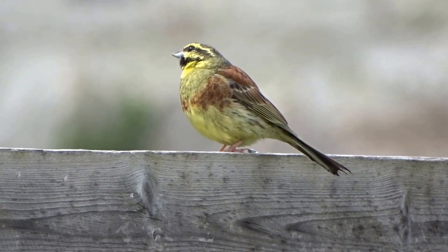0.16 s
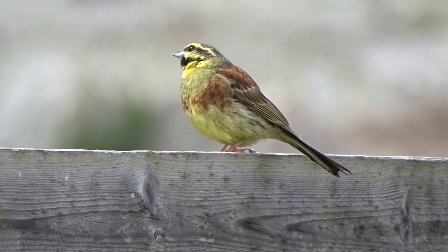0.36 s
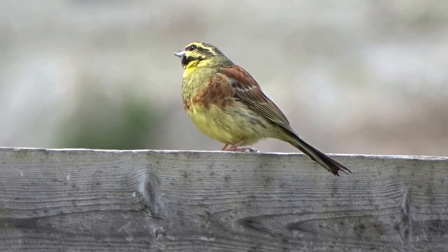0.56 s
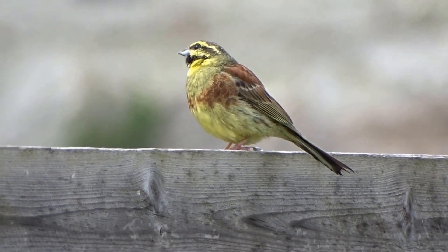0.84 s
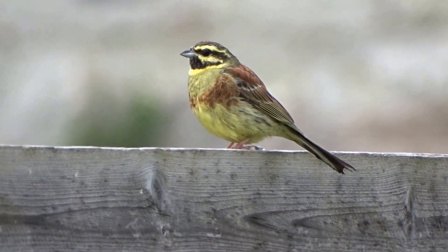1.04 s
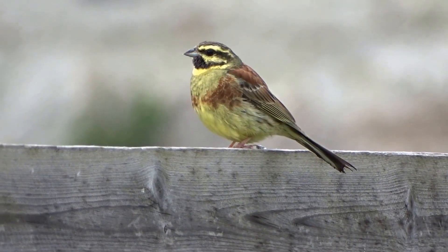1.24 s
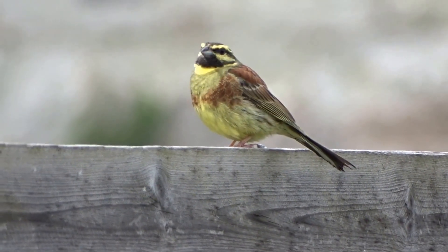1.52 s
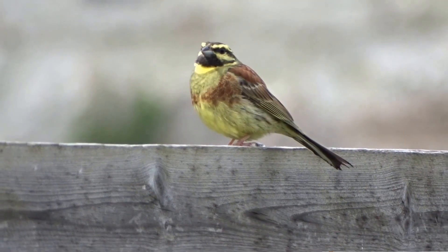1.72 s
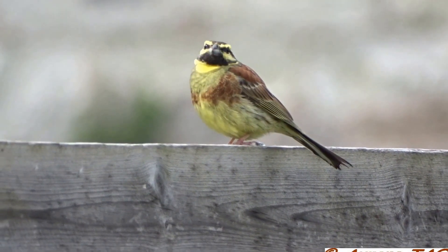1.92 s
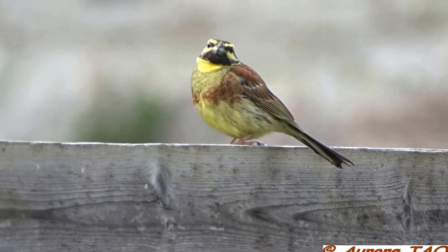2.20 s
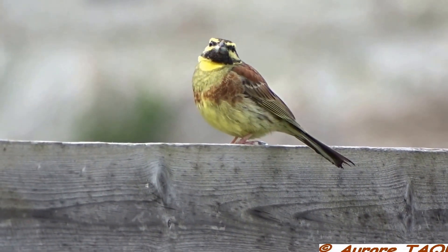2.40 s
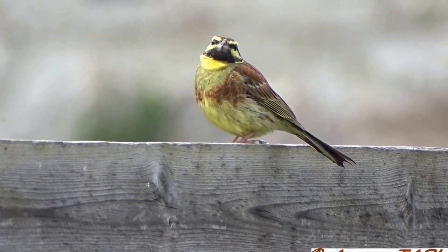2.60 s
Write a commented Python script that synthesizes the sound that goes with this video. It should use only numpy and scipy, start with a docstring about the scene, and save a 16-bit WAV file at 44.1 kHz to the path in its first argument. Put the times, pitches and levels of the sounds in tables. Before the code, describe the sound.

A bunting gives a thin, sharp call, and a second bird answers faintly. Call and answer come once more. Small birds chirp far off outdoors, over a steady rumble of distant traffic and a soft hiss.

```python
"""Distant traffic rumbles from the start, under a soft hiss and a faint band of far birdsong.
A bunting on a fence gives a thin, sharp call: both sides of its voice box glide down together and beat,
and the surroundings scatter the sound back. A second bunting answers faintly as small birds chirp far
off. Call and answer come once more; near the end, more chirps mingle with a few faint rustles."""
import sys
import numpy as np
from scipy import signal
from scipy.fft import rfft, irfft
from scipy.io import wavfile

SR = 44100
rng = np.random.default_rng(int(sys.argv[2]) if len(sys.argv) > 2 else 0)


def file_out(sig):
    """Save sig as 16-bit WAV at sys.argv[1]."""
    # one column per channel
    cols = np.atleast_2d(sig).T
    # limit, then scale
    lim = np.clip(cols, -1, 1)
    pcm = np.round(lim * 32767).astype(np.int16)
    wavfile.write(sys.argv[1], SR, pcm)


N = 121275
T = np.arange(N) / SR


def amp(db):
    """The decibel scale: amplitude grows tenfold every 20 dB."""
    return 10 ** (np.asarray(db) / 20)


def unit(x):
    """Normalisation to an rms of one."""
    return x / np.sqrt(np.mean(x ** 2) + 1e-20)


def curve(points, t):
    """Linear interpolation between table rows."""
    return np.interp(t, *np.transpose(points))


def pan(db):
    """Interchannel level difference: gains that put left db above right."""
    return amp(np.array([[db], [-db]]) / 2)


def add(mix, start_s, sound):
    """Superposition: a sound sums into the mix from its start time."""
    part = mix[:, max(round(start_s * SR), 0):][:, :sound.shape[-1]]
    part += sound[..., :part.shape[1]]


def wander(n, rate_hz):
    """Random modulation: low-passed noise with an rms near one."""
    hz = np.fft.rfftfreq(N, 1 / SR)
    low_pass = np.exp(-(hz / rate_hz) ** 2)
    return unit(irfft(rfft(rng.standard_normal(N)) * low_pass, N))[:n]


def stereo_noise(correlation):
    """Partial coherence: left and right share part of their white noise."""
    common, left, right = rng.standard_normal((3, N))
    return np.sqrt(correlation) * common + np.sqrt(1 - correlation) * np.array([left, right])


def wash(spectrum, correlation):
    """Spectral shaping: coloured stereo noise with an rms of one."""
    hz, db = np.transpose(spectrum)
    colour = amp(np.interp(np.log(np.fft.rfftfreq(N, 1 / SR) + 1), np.log(hz), db))
    return unit(irfft(rfft(stereo_noise(correlation)) * colour, N))


def traffic():
    """Broadband and tonal noise: low rumble, tyre roar and the wavering drones of passing engines."""
    # Each row: frequency in Hz, relative spectral density in dB.
    rumble_spectrum = [(15, -45), (28, -31), (42, -4), (56, -2), (74, -10.5), (105, -8), (135, -4.5),
                       (175, -2), (230, -2), (295, -3), (390, -12), (600, -22.5), (1500, -50.5)]
    roar_spectrum = [(100, -43), (300, -3), (450, -1), (700, 1.5), (1100, 2), (1450, -1), (2000, -8.5),
                     (2700, -15.5), (3400, -22.5), (4500, -29.5), (7000, -52), (12000, -57)]
    # Each row: time in seconds, level in dB.
    rumble_level = [(0, -46), (.45, -47.5), (1.2, -46), (1.4, -45), (1.65, -44), (1.9, -48), (2.35, -44),
                    (2.55, -47.5), (2.75, -48)]
    roar_level = [(0, -45), (.6, -45), (1.15, -44.5), (1.45, -43), (2.0, -42.5), (2.4, -43.5),
                  (2.75, -45.5)]
    # Each row: pitch and its rms waver in Hz, peak level in dB, peak time and spread in seconds.
    drones = [(105.2, 6.95, -55.5, 1.1, 2.8), (165.6, 5, -47, 2.266, 0.14),
              (179.7, 10.73, -52.5, 0.67, 0.46)]
    rumble = wash(rumble_spectrum, correlation=.99) * amp(curve(rumble_level, T))
    roar = wash(roar_spectrum, correlation=.7) * amp(curve(roar_level, T))
    flutter_db = 1.1 * wander(N, rate_hz=15)
    out = rumble + pan(db=2) * roar * amp(flutter_db)
    for hz, waver_hz, db, peak_s, spread_s in drones:
        cycles = np.cumsum(hz + waver_hz * wander(N, rate_hz=9.46)) / SR
        swell = amp(db) * np.exp(-((T - peak_s) / spread_s) ** 2)
        out += swell * np.sin(2 * np.pi * cycles)
    return out


def hiss():
    """A noise floor: soft, nearly steady and strongest in the treble."""
    # Each row: frequency in Hz, relative spectral density in dB.
    spectrum = [(500, -14), (3000, -7.5), (5000, 1), (6300, -2.5), (7600, 2), (9000, 1), (11000, -3.5)]
    # Each row: time in seconds, level in dB.
    level = [(0, -62), (.9, -63.5), (1.798, -62.5), (2.1, -61), (2.3, -61), (2.55, -61.5), (2.75, -61)]
    return wash(spectrum, correlation=.57) * amp(curve(level, T))


def chorus():
    """Incoherent summation: distant birdsong merges into a faint band of noise."""
    # Each row: frequency in Hz, relative spectral density in dB.
    spectrum = [(2600, -53), (3150, -6), (3500, -5.5), (3900, -12), (4600, -25)]
    # Each row: time in seconds, level in dB.
    level = [(0, -65.5), (.6, -66), (1.3, -68), (2.75, -65.5)]
    return wash(spectrum, correlation=.29) * amp(curve(level, T))


def whistle(hz, waver):
    """Frequency modulation: one side of the voice box gives a pure tone of slightly unsteady pitch."""
    unsteady_hz = hz * (1 + waver * wander(len(hz), rate_hz=500))
    return np.sin(2 * np.pi * np.cumsum(unsteady_hz) / SR)


def fall(t, knee_s, hz_per_s=40000, bend_s=.0034):
    """A linear sweep that bends flat at the knee, in Hz above its plateau."""
    return hz_per_s * bend_s * np.logaddexp(0, (knee_s - t) / bend_s)


def bunting():
    """Beating: two voices a few hundred hertz apart interfere; the lower one enters late."""
    # Each row: onset and length in seconds, level in dB, upper and lower plateau pitch in Hz,
    # rasp level in dB, lead-in gain in dB.
    calls = [(.100, 0.0518, -25, 7530, 7200, -54, 2), (1.267, 0.054, -25, 7630, 7215, -66, -4)]
    # Lead-in, swell and release. Each row: time from onset as a share of the length, gain in dB.
    envelope = [(-.42, -38), (-.16, -30), (-.04, -18), (.04, -2.5), (.46, 0.5), (.72, -3), (.87, -12),
                (1, -36)]
    lower_entry_s, lead_blend_s = .0079, .008
    sag_after_s, sag_hz_per_s = .0332, 10000
    out = np.zeros((2, N))
    for onset_s, length_s, db, upper_hz, lower_hz, rasp_db, lead_db in calls:
        t = np.arange(envelope[0][0] * length_s, length_s, 1 / SR)  # negative during the lead-in
        sag_hz = sag_hz_per_s * np.maximum(t - sag_after_s, 0)
        upper = whistle(upper_hz + fall(t, knee_s=.018) - sag_hz, waver=.003)
        lower = whistle(lower_hz + fall(t, knee_s=.021), waver=.003)
        lower *= amp(-1.5) * np.clip(t / lower_entry_s, 0, 1)
        shape_db = curve(envelope, t / length_s) + lead_db * np.clip(-t / lead_blend_s, 0, 1)
        add(out, onset_s + t[0], amp(db + shape_db) * (upper + lower))
        add(out, onset_s, amp(rasp_db) * rasp())
    return out


def rasp(length_s=.013, band_hz=(4500, 8500)):
    """An onset transient: a puff of air gives a burst of band-limited noise."""
    progress = np.arange(0, length_s, 1 / SR) / length_s
    band = signal.butter(3, band_hz, "bandpass", fs=SR, output="sos")
    air = unit(signal.sosfilt(band, rng.standard_normal(N)))
    return air[:len(progress)] * np.sin(np.pi * np.sqrt(progress))


def scatter(sound, t60_s, correlation, gap_s=0, reflections_per_s=2000):
    """Diffuse scattering: weak reflections die away exponentially, after a gap if the source is close."""
    arrivals = (rng.random(N) < reflections_per_s / SR) * (T >= gap_s)
    tail = stereo_noise(correlation) * arrivals * amp(-60 * T / t60_s)
    return signal.fftconvolve(sound, unit(tail) / np.sqrt(N), axes=1)[:, :N]


def surroundings(call):
    """Multipath propagation: the direct call, scatter from near and far, and a few distinct echoes."""
    # Each row: delay in seconds, gain in dB.
    echoes = [(0.0142, -14), (0.028, -25), (.066, -26), (0.16, -39)]
    near = amp(-25) * scatter(call, t60_s=.32, correlation=.68, gap_s=.018)
    far = amp(-25.3) * scatter(call, t60_s=1.35, correlation=.87, gap_s=.018)
    heard = pan(db=.9) * call + near + far
    for delay_s, db in echoes:
        add(heard, delay_s, amp(db) * call)
    return heard


def answering_bunting():
    """Attenuation with distance: a fainter two-voiced call that falls, then steps up at its end."""
    # Each row: start and length in seconds, level in dB, upper plateau pitch and final rise in Hz,
    # fade in dB per second, left over right in dB.
    answers = [(0.355, .062, -49, 7510, 30, 170, 0), (1.491, 0.08, -50, 7400, 270, 30, 4)]
    attack_s, release_s, step_at_s, step_span_s = .016, .013, .052, .0063
    beat_hz, waver = 382, .011
    out = np.zeros((2, N))
    for start_s, length_s, db, plateau_hz, rise_hz, fade_db_per_s, side_db in answers:
        t = np.arange(0, length_s, 1 / SR)
        step = (1 + np.tanh((t - step_at_s) / step_span_s)) / 2
        hz = plateau_hz + fall(t, knee_s=.024) + rise_hz * step
        voices = whistle(hz, waver) + amp(-7) * whistle(hz - beat_hz, waver)
        gate = np.minimum(t / attack_s, 1) ** 2 * np.minimum((length_s - t) / release_s, 1)
        fade_db = fade_db_per_s * np.maximum(t - attack_s, 0)
        add(out, start_s, pan(side_db) * amp(db - fade_db) * gate * voices)
    return out + amp(-7) * scatter(out, t60_s=.18, correlation=.93)


def far_birds():
    """Direct-to-reverberant ratio: the farther the bird, the more echo blurs its slurred chirp."""
    # Each row: start and length in seconds, first and last pitch in Hz, level in dB,
    # echo relative to the chirp in dB, waver as a share of the pitch.
    chirps = [(.356, 0.026, 4120, 3550, -52, -5, 0.027), (0.411, 0.026, 3400, 3500, -51.5, -10, .028),
              (0.599, 0.027, 3590, 3500, -58.5, -12, .01), (1.997, .016, 5100, 4400, -58, 2, .04),
              (2.006, .04, 3900, 3850, -57.5, -2, .018), (2.062, 0.051, 3900, 3420, -64, 4, .05),
              (2.427, 0.025, 4360, 4695, -52.5, -4, 0.027), (2.443, 0.0168, 5270, 3860, -50.5, -4, .035),
              (2.462, .05, 3900, 3250, -60, 3, .045)]
    direct, scattered = np.zeros((2, 2, N))
    for start_s, length_s, first_hz, last_hz, db, echo_db, waver in chirps:
        progress = np.arange(0, length_s, 1 / SR) / length_s
        hz = last_hz + (first_hz - last_hz) * (1 - progress) ** 2
        chirp = amp(db) * np.sin(np.pi * progress) * whistle(hz, waver)
        add(direct, start_s, chirp)
        add(scattered, start_s, amp(echo_db) * chirp)
    return direct + scatter(scattered, t60_s=.4, correlation=.85)


def rustles(grain_db=2.5):
    """Random amplitude modulation: brief swells of high noise take on a grainy texture."""
    # Each row: peak time and spread in seconds, peak level in dB.
    swells = [(2.115, .022, -63), (2.445, .018, -65), (2.625, .016, -63), (2.655, .014, -62)]
    # Each row: frequency in Hz, relative spectral density in dB.
    spectrum = [(4000, -23), (6200, -7), (7800, 0), (9200, -2), (11000, -11)]
    envelope = sum(amp(db) * np.exp(-((T - peak_s) / spread_s) ** 2) for peak_s, spread_s, db in swells)
    grain = unit(amp(grain_db * wander(N, rate_hz=200)))
    return envelope * grain * wash(spectrum, correlation=.85)


def scene():
    """Superposition: the pressures of birds, traffic, rustles and hiss add."""
    birds = surroundings(bunting()) + answering_bunting() + far_birds() + chorus()
    return birds + traffic() + rustles() + hiss()


def record(dry):
    """Band limiting: a linear-phase low-pass filter removes the highest treble."""
    cutoff_hz = 11100
    low_pass = signal.firwin(511, cutoff_hz, window=("kaiser", 9), fs=SR)
    return signal.oaconvolve(dry, low_pass[None], "same")


dry = scene()
out = record(dry)
file_out(out)
```